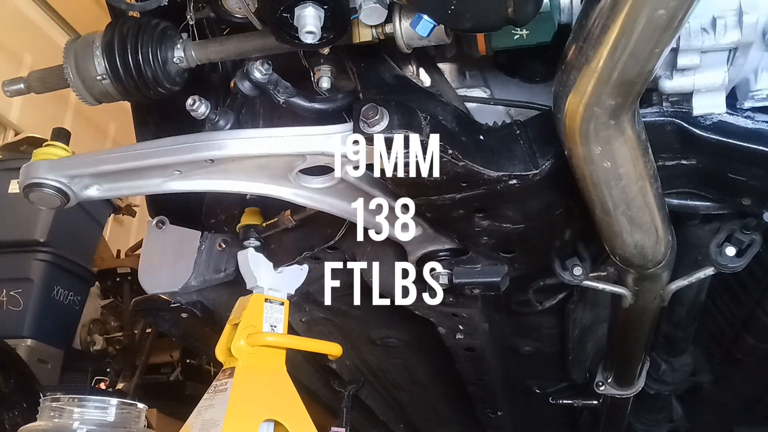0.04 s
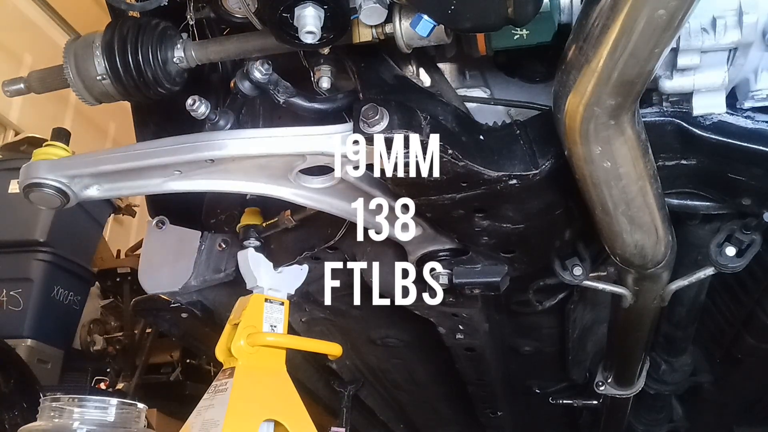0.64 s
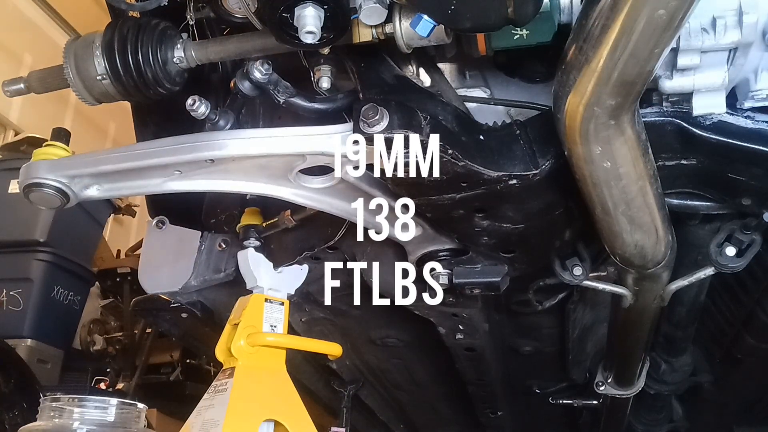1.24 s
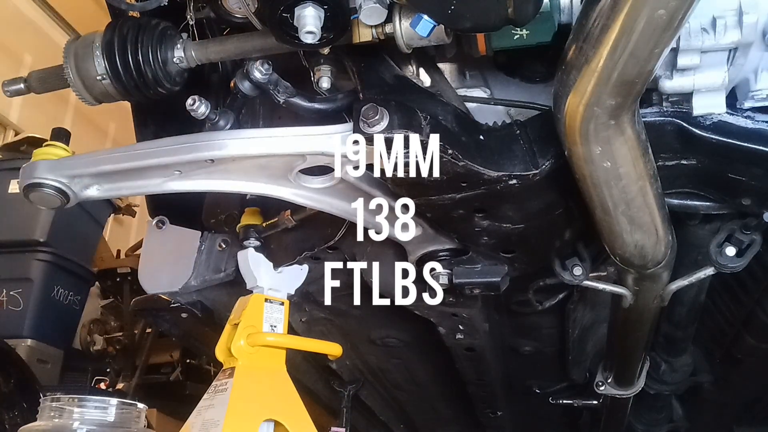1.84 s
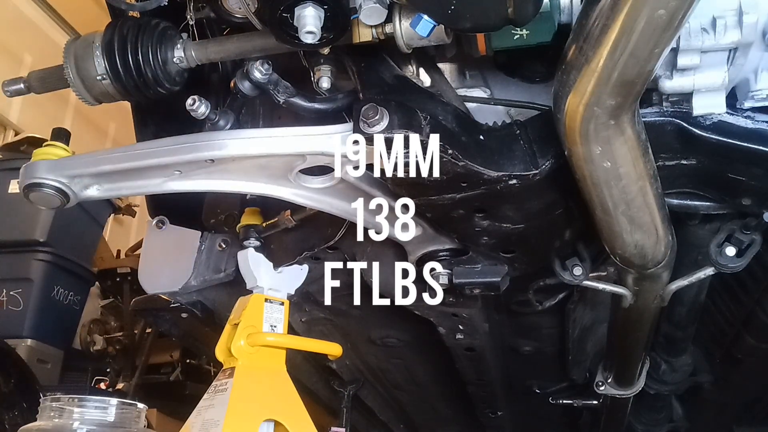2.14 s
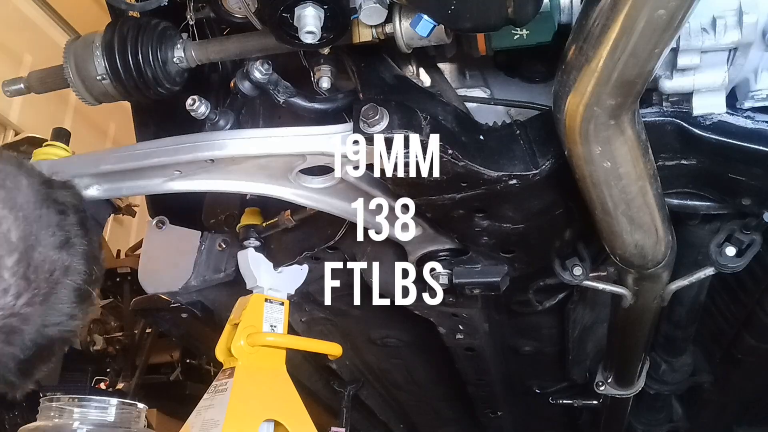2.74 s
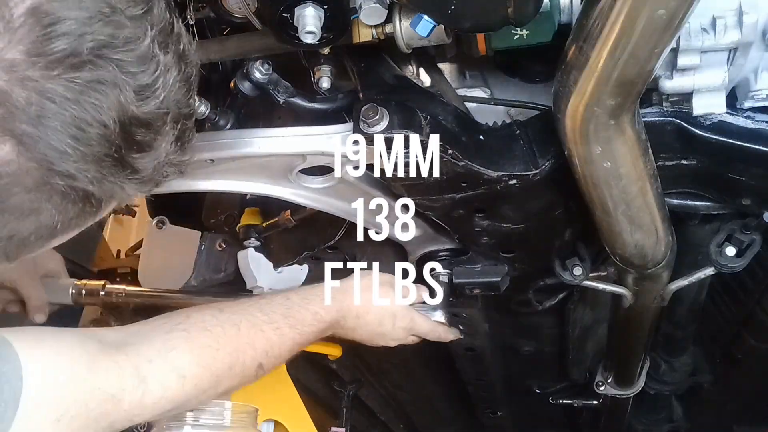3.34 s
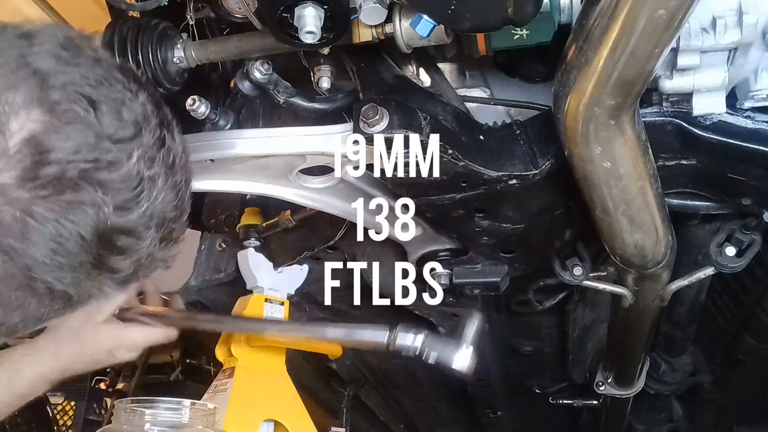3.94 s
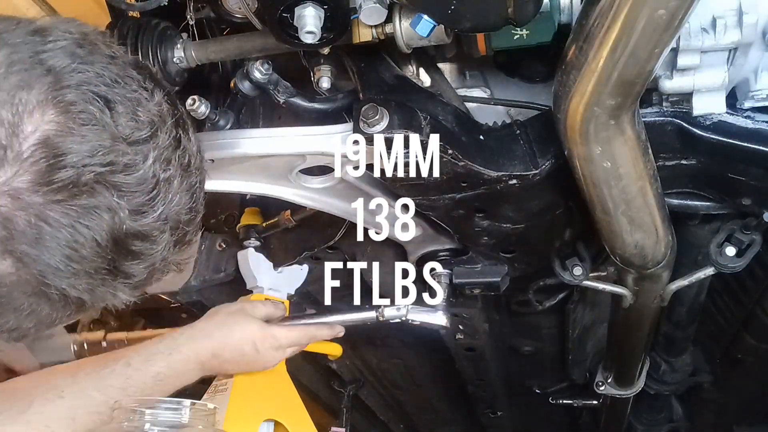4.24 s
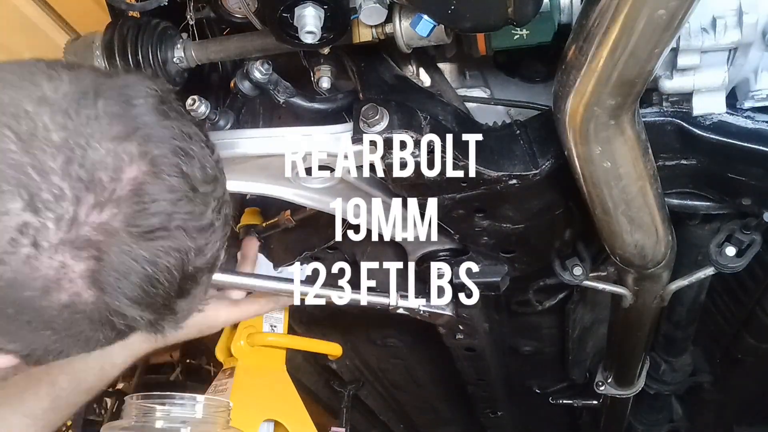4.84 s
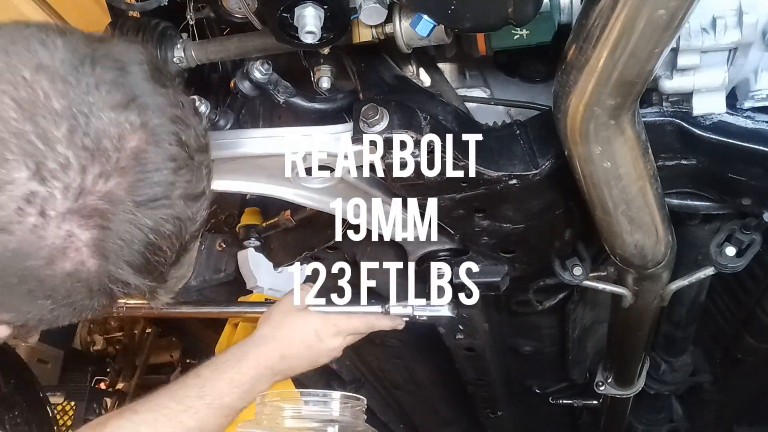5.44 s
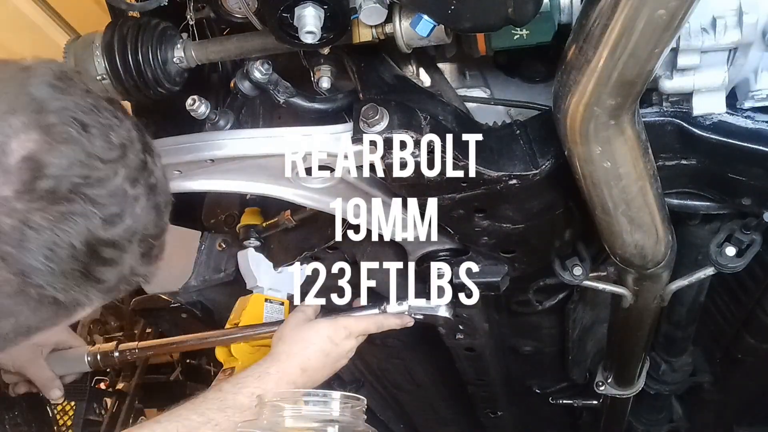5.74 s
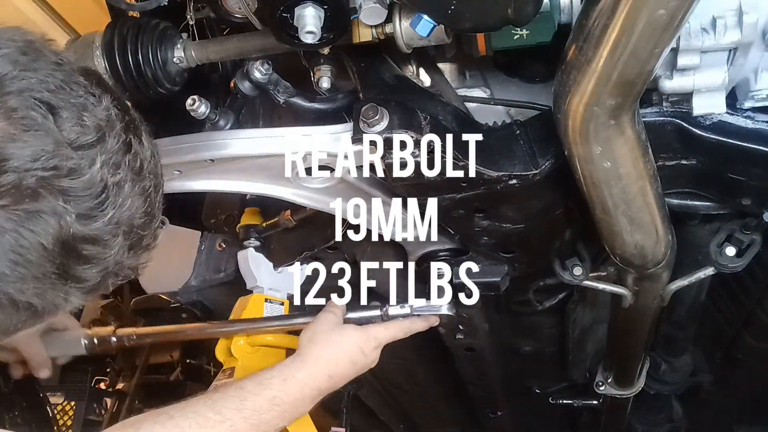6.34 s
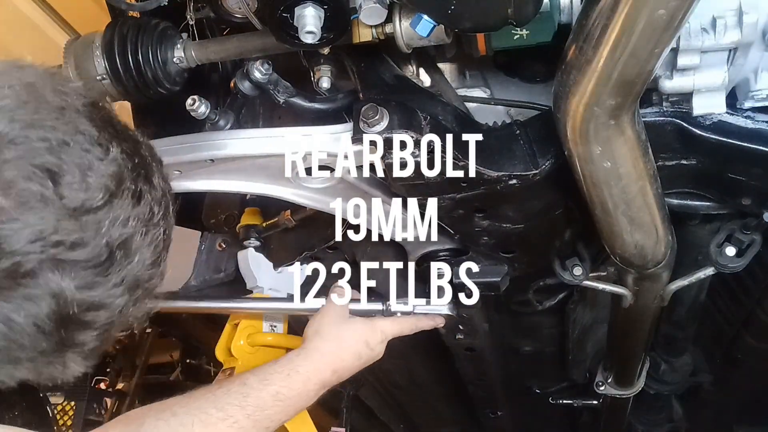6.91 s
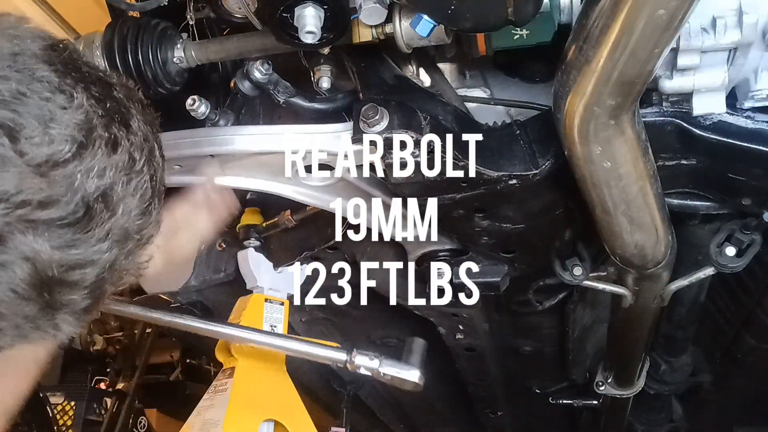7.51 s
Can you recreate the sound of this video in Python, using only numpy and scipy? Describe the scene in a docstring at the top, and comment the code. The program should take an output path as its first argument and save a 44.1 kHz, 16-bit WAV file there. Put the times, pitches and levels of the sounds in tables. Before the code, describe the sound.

From the start, a piston motor, probably an air compressor, runs steadily in a garage: a fast throbbing, low-pitched drone with rumble and a thin whine above it. At about 0.4 seconds a torque wrench gives one sharp, bright, close click, and a faint tick follows near 1.9 seconds. At about 3.1 seconds the motor cuts off abruptly, with a soft hiss of air fading by 3.5 seconds. Steel tool sounds take over: a socket clanks off a bolt at 3.3 seconds, the ratchet head clacks at 3.9, and the socket seats with a sharp click at 4.5. Light rattles, faint scrapes and a dull bump follow. From 6 to 6.4 seconds comes a busier cluster of blunt knocks on the car's suspension and ringing clicks, then a few faint ticks until about 7.3 seconds. The tools sound close with little echo, over a faint hum and room noise.

```python
"""A piston motor, probably an air compressor, throbs in a garage: two puffs a turn drive its pipe
resonances over a rumbling casing, until it cuts off with a fading hiss of turbulent air. Under a car,
a torque wrench clicks over on a bolt; then it is moved, seated and ratcheted in short steel rattles
and knocks on the suspension, each impact exciting the damped modes of the steel.
A faint hum and room noise remain."""
import sys
import numpy as np
from scipy import signal
from scipy.fft import rfft, irfft, next_fast_len
from scipy.io import wavfile
from scipy.ndimage import map_coordinates

SR = 44100
rng = np.random.default_rng(int(sys.argv[2]) if len(sys.argv) > 2 else 0)


def transcribe(u):
    """Save the signal u as a 16-bit wav file named by the first command-line argument.

    u: samples, shape (n,) or (channels, n), limited to [-1, 1]; the rate is SR.
    q: integer samples, one column per channel.
    """
    v = np.clip(np.atleast_2d(u).T, -1, 1)
    q = np.round(v * 32767).astype(np.int16)
    wavfile.write(sys.argv[1], SR, q)


N = 333837
TIME = np.arange(N) / SR

CRANK_HZ, DRONE_HZ, CUT_OFF_S = 10.45, 274.8, 3.098
# Pressure building against the piston: time_s, load_fraction
PISTON_LOAD = [(0, 0), (1.4, 0.07), (1.9, 0.93), (3.1, 1)]

def motor(long_puff_s=1.043, full_load_slowing=.005, run_down_s=.024):
    """Periodic forcing: each crank turn gives a long and a short puff; load slows the crank slightly."""
    load = np.interp(TIME, *np.transpose(PISTON_LOAD))
    lag_s = full_load_slowing * np.cumsum(load) / SR
    turns = CRANK_HZ * (TIME - lag_s - long_puff_s) + .06 * wobble(9.1) / (2 * np.pi)
    long_puff = puff(turns, .02, .3, order=4)
    short_puff = 1.4 * (1 - .17 * load) * puff(turns, .49, .115 + .03 * load)
    puffs = long_puff + short_puff * np.exp(-2.1j)  # they ring the pipe 2.1 radians out of step
    sound = pipe_drone(puffs, load, lag_s) + pipe_whine(turns, load) + swelling_tone()
    sound += valve_sizzle(turns) + casing(turns, np.abs(puffs))
    return sound * np.exp(-np.maximum(TIME - CUT_OFF_S, 0) / run_down_s)

def puff(turns, moment, half_width, order=2):
    """Pulsating flow: one swell a turn; a higher order flattens its top."""
    return np.exp(-(((turns - moment + .5) % 1 - .5) / half_width) ** order)

def driven_tone(hz, flow, phase, flutter_db=.34):
    """Amplitude modulation: a tone of rms 1 follows the flow that drives it."""
    return unit(flow * amp(flutter_db * wobble(23.4)) * np.sin(2 * np.pi * hz * TIME + phase))

def pipe_drone(puffs, load, lag_s):
    """Forced resonance: the pipe throbs with the puffs, sinks under load and swells before the cut-off."""
    turbulent_share = .01 + .02 * load
    phase = np.angle(puffs) + .21 * wobble(3.43) - 2 * np.pi * DRONE_HZ * lag_s
    throb = np.sqrt(1 - turbulent_share) * driven_tone(DRONE_HZ, np.abs(puffs), phase)
    turbulence = np.sqrt(turbulent_share) * noise_band(DRONE_HZ, 48)
    surge_db = 2.5 * bell(TIME - CUT_OFF_S + .049, .041)
    return amp(-27 - 2.5 * load + surge_db) * (throb + turbulence)

STEADY_FLOW = .22  # flow between puffs, relative to a puff's height
# Higher pipe resonances: pitch_hz, level_db, moment_turns, half_width_turns, full_load_gain_db
PIPE_MODES = [(438, -52, .8, .4, 3), (508, -44.5, .2, .2, 2), (524, -44, .77, .14, 3.5),
              (836, -47, .44, .2, -4), (866, -45, .7, .1, -4), (1005, -44, .42, .35, -.5),
              (1507, -59, .5, .5, 0), (3268, -50.5, .4, .8, -1)]

def pipe_whine(turns, load):
    """Forced higher modes: each swells at its own moment of the turn."""
    whine = np.zeros(N)
    for hz, db, moment, half_width, load_db in PIPE_MODES:
        flow = STEADY_FLOW + puff(turns, moment, half_width)
        phase = .53 * (wobble(13) + 2 * wobble(2.86))
        whine += amp(db + load_db * load) * driven_tone(hz, flow, phase)
    return whine

def swelling_tone(pitch_hz=1924, peak_s=.92, period_s=.87):
    """Slow amplitude modulation: a thin motor tone swells and fades."""
    level_db = -57 + 6 * np.cos(2 * np.pi * (TIME - peak_s) / period_s)
    return amp(level_db) * driven_tone(pitch_hz, 1, wobble(14))

# Air singing in the valves: centre_hz, half_width_hz, level_db, moment_turns, half_width_turns
VALVE_BANDS = [(6230, 160, -63.5, .47, .25), (8450, 250, -73, .1, .22), (11050, 200, -68.5, .35, .33)]

def valve_sizzle(turns):
    """Flow noise: narrow bands pulse once a turn as air passes the valves."""
    return sum(amp(db) * unit(noise_band(hz, width_hz) * (STEADY_FLOW + puff(turns, moment, width)))
               for hz, width_hz, db, moment, width in VALVE_BANDS)

# Broad spectrum of the casing: frequency_hz, relative_density_db
CASING_SPECTRUM = [(25, -33), (60, -13.5), (110, -8.5), (165, -2), (230, -3.5), (325, 2), (395, -15.5),
                   (520, -6.5), (670, -13), (900, -8.5), (1700, -16), (3100, -16.5), (4500, -20.5),
                   (6300, -28.5), (7500, -37.5), (11200, -36.5), (11600, -46), (13000, -46.5), (15500, -43)]
# Casing resonances: centre_hz, width_hz, gain_db
CASING_RESONANCES = [(553, 86, 7), (757, 53, 7.5), (903, 36, 2), (1220, 35, 5), (1493, 30, 5.5),
                     (1903, 110, 2.5), (2484, 26, 8), (2630, 32, 4), (3120, 320, 8), (3420, 81, -3),
                     (3870, 53, 6), (4130, 120, 5), (4360, 39, 8), (5230, 46, 6.5), (5200, 70, 3),
                     (7500, 120, 7.5), (9010, 90, 9), (10210, 80, 7)]

def casing(turns, flow, repeating_share=.15, crossover_hz=400, throb_db=3.5):
    """Structure-borne noise: clatter, partly repeating each turn, shakes out a low rumble and a rush."""
    beat_phase = 4 * np.pi * turns  # two beats a turn
    repeating = np.resize(rng.standard_normal(round(SR / CRANK_HZ)), N)
    clatter = np.sqrt(repeating_share) * repeating + np.sqrt(1 - repeating_share) * rng.standard_normal(N)
    clatter *= amp(.77 * np.cos(beat_phase))
    shell = filtered(clatter, lambda hz: amp(along(CASING_SPECTRUM, hz) + peaks(CASING_RESONANCES, hz)))
    low = filtered(shell, lambda hz: 1 / (1 + (hz / crossover_hz) ** 8))
    notched = filtered(low, lambda hz: amp(-15 * bell(hz - DRONE_HZ, 50)))
    rumble = amp(-34) * unit(notched * amp(throb_db * unit(flow)))
    rush = amp(-35.5) * unit(shell - low)
    return rumble + rush + amp(-53.5) * np.sin(beat_phase)

# Escaping air: frequency_hz, relative_density_db
JET_SPECTRUM = [(1000, -5), (4000, 3.5), (7000, -1.5), (11000, -13), (13000, -7), (15500, -13)]

def vent(open_s=3.015, close_s=3.457, attack_s=.034, release_s=.049, blast_decay_s=.25):
    """Jet turbulence: a valve opens as the motor stops; the blast sinks towards a leak until it shuts."""
    valve = np.exp(np.minimum(TIME - open_s, 0) / attack_s - np.maximum(TIME - close_s, 0) / release_s)
    blast = amp(-44.5) * np.exp(-np.maximum(TIME - open_s, 0) / blast_decay_s)
    leak = amp(-63)
    return valve * (blast + leak) * shaped_noise(JET_SPECTRUM)

# The torque wrench gives, breaks over and rebounds: start_s, level_db
WRENCH_BLOWS = [(0.372, -30), (0.3795, -19), (0.3828, -21)]
# Modes of its tube: pitch_hz, relative_level_db, t60_s
TUBE_MODES = [(3095, -12, .035), (3505, -14, .03), (3908, -14, .03), (4270, -9, .036), (4590, -10.5, .034),
              (4807, -12, .03), (5141, -.5, .045), (5674, -20, .03), (6900, -22, .02)]

def torque_wrench():
    """Impulse excitation: the release strikes the tube three times in quick succession."""
    return ringing(WRENCH_BLOWS, TUBE_MODES, crack=.76, buzz_rad=.22)

# The crack of steel on steel: frequency_hz, gain_db
CRACK_SPECTRUM = [(800, -19), (2500, 5), (4300, 20), (5300, -10), (7000, -5), (15000, -24)]

def ringing(blows, modes, crack, buzz_rad=.55, buzz_hz=260, contact_s=.00012, crack_t60_s=.025):
    """Damped free vibration: each blow cracks and starts the modes; loose contact jitters their phase."""
    track, t = np.zeros(N), np.arange(SR // 4) / SR
    attack = 1 - bell(t, contact_s)
    for start_s, db in blows:
        ring = np.zeros(len(t))
        for hz, mode_db, t60 in modes:
            envelope = amp(mode_db + rng.normal(0, 1) - 60 * t / t60)
            phase = 2 * np.pi * (hz * t + rng.random())
            jitter = buzz_rad * np.interp(t * buzz_hz, np.arange(buzz_hz), rng.standard_normal(buzz_hz))
            ring += envelope * np.sin(phase + jitter)
        burst = rng.standard_normal(len(t)) * amp(-60 * t / crack_t60_s)
        snap = filtered(burst, lambda hz: amp(along(CRACK_SPECTRUM, hz)))
        add(track, start_s, amp(db) * attack * (ring + crack * snap))
    return track

# The seated socket sings on: start_s, level_db
SEATED_BLOWS = [(5.764, -45), (6.365, -39), (6.371, -25.5)]
# Its modes on the bolt: pitch_hz, relative_level_db, t60_s
SEATED_MODES = [(1421, 12, .055), (1580, -4, .15), (4450, -4, .04), (12460, -16, .036)]
# The socket drops onto the bolt: start_s, level_db
SEATING_BLOWS = [(4.517, -22)]
# Its modes as it seats: pitch_hz, relative_level_db, t60_s
SEATING_MODES = [(4200, 3, .02), (4440, -2.5, 0.031), (10000, -16, .02), (10800, -31, 0.016)]
# The socket clanks off the bolt: start_s, level_db
PULL_OFF_BLOWS = [(3.274, -27.5)]
# Its free modes: pitch_hz, relative_level_db, t60_s
FREE_MODES = [(1790, 6.5, 0.032), (2450, 3, 0.039), (2800, -3, 0.032), (3180, -4, .03), (9920, -16, 0.022)]

def socket():
    """Boundary conditions set the modes: the socket has one ring seated, one seating and one free."""
    return (ringing(SEATED_BLOWS, SEATED_MODES, crack=.1)
            + ringing(SEATING_BLOWS, SEATING_MODES, crack=.28)
            + ringing(PULL_OFF_BLOWS, FREE_MODES, crack=.05))

# The ratchet head hits its stop: start_s, level_db
HEAD_BLOWS = [(3.884, -25.5), (3.890, -24), (3.898, -33), (3.917, -45), (6.044, -46), (6.279, -47)]
# Modes of the head: pitch_hz, relative_level_db, t60_s
HEAD_MODES = [(1282, 1, .055), (1725, -1, .07), (2250, -4, .04), (2615, -1, .05), (2815, -3, .04),
              (3490, 0, .038), (3800, -4, .03), (4270, 2, .04), (4790, 0, .035), (5600, -6, .025)]

def ratchet_head():
    """Impact and rebound: the head clacks against its stop and bounces, ringing each time."""
    return ringing(HEAD_BLOWS, HEAD_MODES, crack=.69)

STEEL_COLOUR_DB = [-11.5, -3.5, -3, -15.5]  # steel against steel: thud, clank, ring, sizzle
# Short steel rattles and scrapes, and one bright spit of air as the motor stops:
# start_s, length_s, main_resonance_hz, second_resonance_hz, level_db, hardness_db_per_octave
SHORT_BURSTS = [ (2.903, 0.043, 3080, 4440, -51, 4.5), (3.024, 0.015, 1930, 3400, -33, -2.5),
                (3.040, 0.047, 6900, 7900, -50.5, 6), (3.135, 0.017, 1120, 1370, -45, -8),
                (3.297, 0.046, 1010, 1460, -44.5, -7), (3.343, 0.021, 4300, 5000, -39, -4),
                (3.437, 0.022, 1060, 4400, -34.5, -5), (3.670, 0.022, 4870, 13000, -66.5, 5.5),
                (3.814, .05, 1770, 3500, -47, -0.3), (3.880, 0.024, 2640, 5380, -30.5, -1),
                (3.913, 0.012, 1760, 4790, -50, 0), (4.136, 0.016, 1490, 3080, -32, -3.5),
                (4.33, 0.025, 4470, 3400, -54.5, -2.5), (4.361, 0.025, 930, 1250, -44, -6.5),
                (4.455, 0.031, 910, 1260, -45, -5), (4.638, 0.026, 1190, 8000, -52.5, 2.5),
                (4.995, 0.023, 1900, 5900, -50, 1.5), (5.012, 0.028, 3400, 2900, -57, 0.5),
                (5.234, 0.014, 1370, 4400, -39.5, -0.5), (5.731, 0.018, 1910, 4500, -60, 3),
                (5.755, 0.026, 1350, 4400, -36.5, -2), (6.037, .02, 580, 4100, -35.5, 3.5),
                (6.082, 0.027, 4240, 7800, -60.5, 7), (6.150, 0.024, 2820, 4300, -33, -0.5),
                (6.276, .014, 1110, 5130, -32.5, 0.5), (6.363, 0.021, 1220, 4760, -26, -1),
                (6.396, 0.012, 4450, 5200, -47, -9), (6.711, 0.024, 1710, 1330, -46, -2.5),
                (6.748, 0.026, 1720, 4630, -49, .5), (6.792, 0.0089, 1770, 3480, -48, 2),
                (7.155, 0.0093, 720, 1260, -50, -7.5), (7.298, 0.021, 1050, 2600, -52.5, -4)]

def rattles():
    """Impact trains: pawl and socket rattle and scrape; one bright burst is a spit of air."""
    return chatter(SHORT_BURSTS, STEEL_COLOUR_DB, impacts_per_s=660, scrape=.14, settle=.057, settle_s=.031)

KNOCK_COLOUR_DB = [-6.5, -10.5, -17.5, -27]  # a blunt knock: thud, clank, ring, sizzle
# The wrench bumps the suspension arm: start_s, length_s, resonance_hz, level_db, hardness_db_per_octave
ARM_KNOCKS = [ (3.164, 0.047, 286, -33.5, 1), (3.340, 0.052, 450, -36.5, 1),
              (3.635, 0.047, 212, -40.5, -1.2), (4.391, 0.066, 550, -51.5, -3),
              (4.516, 0.0089, 394, -32, -2), (4.532, 0.038, 515, -39.5, 1), (4.714, 0.014, 417, -47, -1.5),
              (5.245, 0.043, 227, -33.5, 1), (5.280, 0.061, 390, -45.5, 1), (6.023, 0.028, 216, -23.5, 1),
              (6.072, 0.063, 246, -31.5, -0.2), (6.116, 0.023, 444, -28, -1.5), (6.150, 0.015, 418, -22, 0),
              (6.153, .02, 249, -32.5, -4), (6.304, 0.038, 236, -35, -2.5)]

def suspension_knocks():
    """Blunt contact favours low modes: juddering bumps shake the suspension arm."""
    return chatter(ARM_KNOCKS, KNOCK_COLOUR_DB, impacts_per_s=624, scrape=.19, settle=.14, settle_s=.02)

# The hand shifts on the wrench: start_s, end_s
GRIP_SHIFTS = [(4.299, 4.48), (5.302, 5.38), (5.528, 5.6), (6.49, 6.56)]

def handling(length_s=.053, resonance_hz=3000, hardness=-1, count=2):
    """Friction noise: faint scrapes fall at random moments of each change of grip."""
    scrapes = []
    for from_s, to_s in GRIP_SHIFTS:
        for k in range(count):
            start_s = from_s + (to_s - from_s) * (k + rng.random()) / count - length_s / 2
            scrapes.append((start_s, length_s, resonance_hz, rng.normal(-63, 2), hardness))
    return chatter(scrapes, STEEL_COLOUR_DB, impacts_per_s=496, scrape=.2, settle=.092, settle_s=.02)

def chatter(runs, colour_db, impacts_per_s, scrape, settle, settle_s, size=8192):
    """Shot noise: random impacts over sliding friction drive the steel; each run swells, fades, settles."""
    track, t = np.zeros(N), np.arange(size) / SR
    for start_s, length_s, *main_hz, db, hardness in runs:
        impacts = (rng.random(size) < impacts_per_s / SR) * amp(2 * rng.standard_normal(size))
        past_peak_s = t - length_s
        swell = np.exp(-np.abs(past_peak_s / (.65 * length_s)) ** 3)
        tail = settle * (past_peak_s > 0) * np.exp(-np.abs(past_peak_s - length_s / 2) / settle_s)
        force = (swell + tail) * (impacts + scrape * rng.standard_normal(size))
        burst = amp(db) * steel(force, main_hz, colour_db, hardness, length_s)
        add(track, start_s - length_s / 2, burst)  # the fade-in leads the start by half a length
    return track

# Single hard contacts:
# start_s, main_resonance_hz, second_resonance_hz, level_db, hardness_db_per_octave, decay_s
HARD_CONTACTS = [ (1.9228, 2540, 11000, -39.5, 1.5, 0.0022), (1.9252, 4550, 6400, -46, 3.5, 0.0052),
                 (3.028, 1810, 8200, -33, 0, 0.0076), (3.164, 1280, 4500, -40.5, -3, 0.0083),
                 (3.272, 1110, 2560, -34.5, -1, 0.011), (3.468, 1620, 4200, -43, -3, 0.013),
                 (3.595, 5250, 12000, -53.5, -4.5, 0.0074), (4.131, 1470, 3080, -40.5, -4.5, 0.0092),
                 (4.182, 824, 7000, -36.5, -1.8, 0.011), (4.516, 4100, 4370, -43.5, 2, 0.012),
                 (4.644, 1180, 8000, -50.5, 1.5, .007), (4.994, 1870, 6000, -46.5, 0.5, 0.0079),
                 (5.041, 3400, 2920, -54, -1, 0.0026), (5.233, 1350, 4430, -47.5, -5, .01),
                 (5.357, 300, 7000, -49.5, 0.5, 0.0057), (6.132, 1380, 2780, -39.5, -1.5, 0.0054),
                 (6.2718, 4300, 5250, -35.5, -3, 0.01), (6.3622, 1300, 5000, -34, 0.5, 0.0042),
                 (6.791, 1800, 5900, -47, 1, 0.0074)]

def clicks(gain_db=1, size=8192):
    """Impulse response: one hard contact rings the steel, followed by quickly dying chatter."""
    track, t = np.zeros(N), np.arange(size) / SR
    for start_s, *main_hz, db, hardness, decay_s in HARD_CONTACTS:
        force = rng.standard_normal(size) * np.exp(-t / decay_s)
        force[0] += 2  # the first impact
        add(track, start_s, amp(db) * steel(force, main_hz, STEEL_COLOUR_DB, hardness, length_s=.012))
    return amp(gain_db) * track

# Broad response of wrench, socket and suspension arm together: frequency_hz, gain_db
STEEL_SPECTRUM = [(100, 4.5), (220, -8.5), (500, -0.5), (800, -0.5), (1300, 1.5), (2000, -6), (4500, -3.5),
                  (5600, -9), (8000, -14.5), (9500, -21), (15500, -28)]
# Their shared resonances: centre_hz, width_hz, gain_db
STEEL_RESONANCES = [(238, 63, 11.5), (445, 72, 5.5), (596, 27, 5.5), (920, 58, 0), (1273, 32, -2),
                    (1488, 60, -6), (1770, 41, -2.5), (2400, 510, 3.5), (2630, 110, 3), (2880, 210, 0),
                    (3180, 150, 3.5), (3770, 36, 6.5), (4230, 200, 1), (4360, 74, -1), (5200, 180, 5.5),
                    (5490, 50, -15)]
# The registers thud, clank, ring and sizzle: low_hz, high_hz
REGISTERS = [(150, 700), (700, 2000), (2000, 5800), (5800, 15500)]

def steel(force, main_hz, colour_db, hardness, length_s):
    """Source and filter: a force excites the resonances; harder contact tilts them towards the treble."""
    hz = np.fft.rfftfreq(len(force), 1 / SR) + 1
    struck = [(centre, 6 * np.sqrt(centre), 9) for centre in main_hz]  # higher resonances are broader
    # every point of contact favours a few other modes
    favoured = [(900 + 1000 * (k + rng.random()), 200, 3.5) for k in range(10)]
    body = amp(along(STEEL_SPECTRUM, hz) + peaks(STEEL_RESONANCES + struck + favoured, hz))
    sound = np.zeros(len(force))
    for db, (low_hz, high_hz) in zip(colour_db, REGISTERS):
        centre_hz = np.sqrt(low_hz * high_hz)
        tilt_db = hardness * np.log2(centre_hz / 1200)
        focus_db = 5.5 * bell(np.log2(centre_hz / main_hz[0]), 1.43)  # lift near the main resonance
        passband = 1 / np.sqrt((1 + (low_hz / hz) ** 12) * (1 + (hz / high_hz) ** 12))
        part = irfft(rfft(force) * minimum_phase(body * passband))
        sound += amp(db + tilt_db + focus_db) * part * np.sqrt(length_s * SR) / np.linalg.norm(part)
    return sound

# Reverberation time of the garage: frequency_hz, t60_s
GARAGE_DECAY = [(200, 0.17), (2000, 0.15), (10000, 0.12)]

def garage(x):
    """Reverberation: floor and underbody reflect a short tail whose treble dies first."""
    hz, t, spectrum = signal.stft(rng.standard_normal(SR // 2), SR, nperseg=256)
    tail = signal.istft(spectrum * amp(-60 * t / along(GARAGE_DECAY, hz)[:, None]), SR, nperseg=256)[1]
    return signal.fftconvolve(np.pad(x, (200, 0)), tail / np.linalg.norm(tail))[:N]

# Room noise: frequency_hz, relative_density_db
ROOM_SPECTRUM = [(20, -7), (40, -10), (65, 13.5), (100, 3), (150, -2), (200, 4), (350, -2), (550, -1),
                 (700, -6.5), (2500, -11.5), (4500, -18.5), (5400, -26), (6300, -39), (10000, -47),
                 (15500, -48)]
# Faint hums: pitch_hz, level_db
HUM_TONES = [(70, -61), (194, -61), (203, -72), (274, -58.5), (438, -63.5), (560, -70.5)]

def background():
    """Noise floor: wavering hums lie over broadband room noise, whose level dips briefly once."""
    noise = shaped_noise(ROOM_SPECTRUM)
    hum = sum(amp(db + 1.5 * wobble(12)) * unit(np.sin(2 * np.pi * hz * TIME + wobble(16)))
              for hz, db in HUM_TONES)
    dip_db = -4.5 * bell(TIME - 4.03, .097)
    return amp(-50 + dip_db + .81 * wobble(14)) * noise + hum

def amp(db):
    """Decibels to gain."""
    return 10 ** (np.asarray(db) / 20)

def unit(x):
    """Scale to rms 1."""
    return x / np.sqrt(np.mean(x ** 2) + 1e-20)

def bell(x, width):
    """A Gaussian of height 1 around x = 0."""
    return np.exp(-(x / width) ** 2)

def along(points, hz):
    """Interpolate (frequency_hz, value) points on a log axis."""
    knots_hz, values = np.transpose(points)
    return np.interp(np.log(hz + 1), np.log(knots_hz + 1), values)

def peaks(resonances, hz):
    """Lorentzian peaks: the decibels that resonances add to a spectrum."""
    return sum(db / (1 + (2 * (hz - centre) / width) ** 2) for centre, width, db in resonances)

def wobble(rate):
    """A smooth random curve of rms 1, rate knots a second."""
    at = np.arange(0, N + 64, 64)
    coarse = map_coordinates(rng.standard_normal(int(N * rate / SR) + 4), [at * rate / SR])
    return np.interp(np.arange(N), at, unit(coarse))

def filtered(x, gain):
    """Zero-phase filtering by a gain that depends on frequency."""
    size = next_fast_len(len(x) + SR // 4)
    return irfft(rfft(x, size) * gain(np.fft.rfftfreq(size, 1 / SR)), size)[:len(x)]

def minimum_phase(gain):
    """Causality: a response with this gain that rings only after the blow."""
    cepstrum = irfft(np.log(np.maximum(gain, 1e-6)))
    half = len(cepstrum) // 2
    return np.exp(rfft(np.r_[cepstrum[0], 2 * cepstrum[1:half], np.zeros(half)]))

def noise_band(centre_hz, half_width_hz):
    """Narrowband noise: a fuzzy tone of rms 1."""
    white = rng.standard_normal(N)
    return unit(filtered(white, lambda hz: 1 / (1 + ((hz - centre_hz) / half_width_hz) ** 4)))

def shaped_noise(spectrum):
    """Noise of rms 1 with the given spectral shape."""
    return unit(filtered(rng.standard_normal(N), lambda hz: amp(along(spectrum, hz))))

def add(track, start_s, sound):
    """Mix a sound into the track."""
    part = track[round(start_s * SR):][:len(sound)]
    part += sound[:len(part)]

def scene():
    """Superposition of motor, tools and background; the close wrench click is nearly dry."""
    wrench = torque_wrench()
    tools = socket() + ratchet_head() + rattles() + suspension_knocks() + handling() + clicks()
    reflections = garage(amp(-24) * wrench + amp(-14) * tools)
    return (motor() + vent() + wrench + tools + reflections + background())[None]

def record(dry):
    """Band limiting: nothing above 15850 Hz remains."""
    return np.array([filtered(channel, lambda hz: hz < 15850) for channel in dry])

dry = scene()
out = record(dry)
transcribe(out)
```